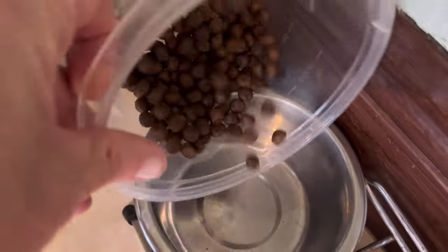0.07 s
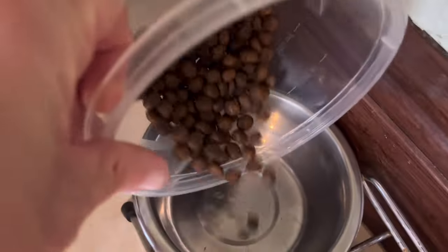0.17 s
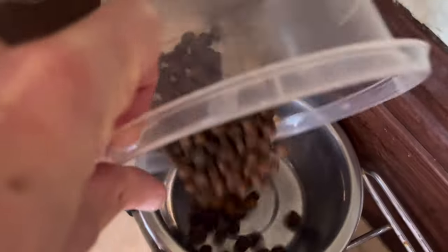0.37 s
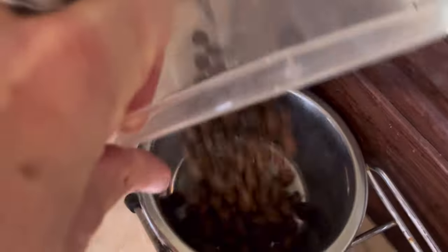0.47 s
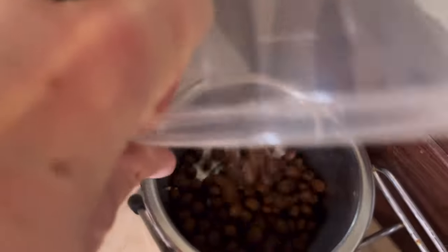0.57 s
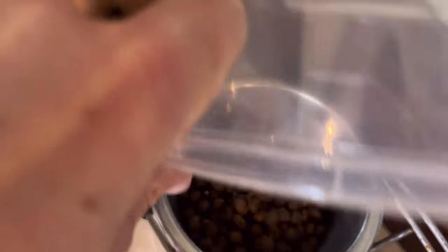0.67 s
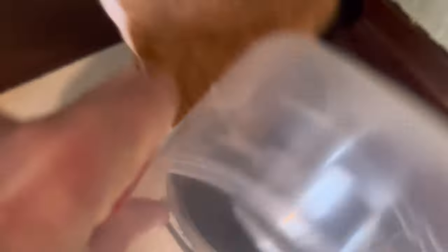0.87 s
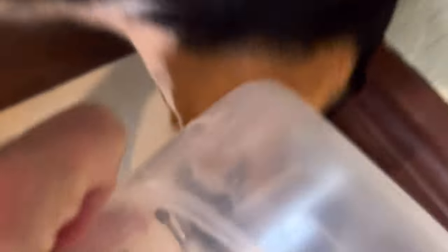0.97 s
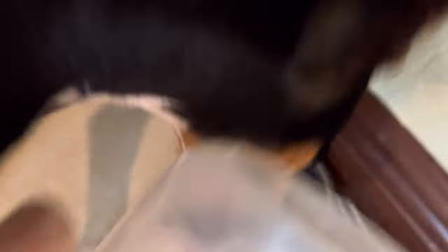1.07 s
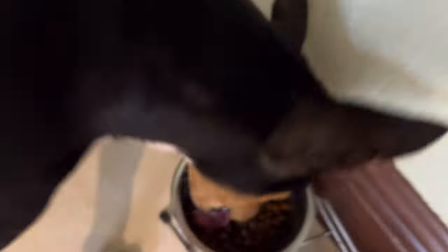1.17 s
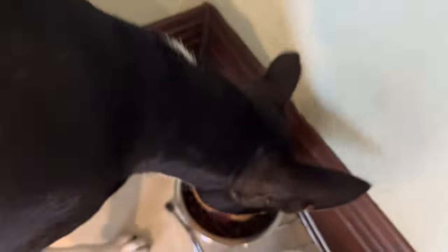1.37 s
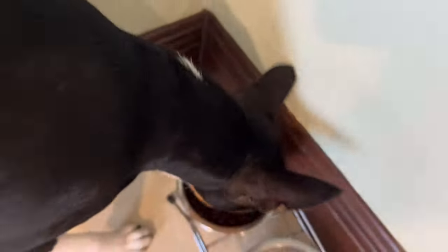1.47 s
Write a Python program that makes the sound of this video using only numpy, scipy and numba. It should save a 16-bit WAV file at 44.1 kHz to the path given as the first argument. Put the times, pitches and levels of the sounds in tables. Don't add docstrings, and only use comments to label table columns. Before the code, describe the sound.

Dry pet food pellets pour from a plastic tub into a ringing steel bowl, then settle

```python
import sys
import numpy as np
from scipy import signal
from scipy.fft import rfft, irfft
from scipy.io import wavfile
from scipy.ndimage import uniform_filter1d
from numba import njit

SR = 44100
rng = np.random.default_rng(int(sys.argv[2]) if len(sys.argv) > 2 else 0)


def wav_out(sig):
    wavfile.write(sys.argv[1], SR, np.round(np.clip(np.atleast_2d(sig).T, -1, 1) * 32767).astype(np.int16))


def level_to_linear(level):
    exponent = np.asarray(level, float) / 20
    return 10 ** exponent


N = 66150
T = np.arange(N) / SR

# pitch in Hz, level in dB per Hz.
ROOM_TONE = [(15, -54), (25, -26), (118, -12), (264, -17.5), (344, -22), (588, -26.5), (691, -22.5),
             (4870, -39.5), (15000, -52)]
# pitch in Hz, level in dB, width of its wavering in Hz.
HUM = [(60, -52, 18), (120.1, -55.5, 12)]
# time in seconds, gain in dB.
ROOM_GAIN = [(0, 9), (.25, 9.5), (.33, -12), (.72, -10), (.85, 13.5), (1.5, 4.5)]

# time in seconds, level in dB.
SLIDE_LEVEL = [(0, -31), (.03, -38), (.06, -38), (.12, -30), (.2, -32), (.25, -27), (.29, -40.5)]
# pitch in Hz, level in dB per Hz.
SLIDE_TONE = [(120, -55), (200, -10), (880, 3), (1490, -6), (2020, -2.5), (6420, -15.5), (7970, -20.5),
              (11400, -17.5), (15000, -45)]
# start in seconds, peak in dB, pitch in Hz.
TUB_KNOCKS = [(.003, -19, 2100), (.016, -15, 650), (.030, -28, 1860), (.037, -30, 3220), (.067, -24, 3260),
              (.093, -20, 2530), (.107, -22.5, 910), (.1155, -20, 1150), (.127, -18.5, 2130),
              (.1365, -14, 784), (.160, -27, 1920), (.167, -19.5, 1940), (.194, -14.5, 2120),
              (.2005, -17.5, 2110), (.2232, -13, 2900), (.250, -18.5, 1970), (.262, -25, 2370)]
# start in seconds, peak in dB, pitch in Hz.
EXTRA_KNOCK = (.2445, -6, 2520)
# pitch in Hz, level in dB.
TUB_BODY = [(650, -7.5), (950, -3.5), (2050, 1), (2850, -1.5), (3300, -6.5), (4400, -5.5), (5400, -15),
            (6700, -33)]

# time in seconds, level in dB.
POUR_LEVEL = [
    (.27, -24.5),
    (.33, -19.5),
    (.45, -15.5),
    (.62, -20.5),
    (.685, -28),
    (.72, -38.5),
    (.76, -44.5),
    (.8, -57),
]
# pitch in Hz, level in dB per Hz.
POUR_TONE = [(180, -70), (300, -60), (704, 4), (2180, -7.5), (2660, -2), (5840, -1), (8520, -2),
             (12800, -10.5), (15100, -39)]
# time in seconds, level in dB.
BARE_SHARE = [(.28, -8.5), (.45, -13.5), (.6, -7.5), (.75, -4)]
# time in seconds, level in dB.
COVERED_SHARE = [(.28, -2.5), (.4, -5), (.55, 1.5), (.7, 1)]
# time in seconds, decay in dB per second.
PILE_DAMPING = [(.28, 15), (.38, 35), (.485, 101), (.53, 438), (.75, 900)]
# start in seconds, peak in dB, pitch the struck spot favours in Hz.
STRIKES = [(0.2807, -7, 1700), (0.2832, -10.5, 667), (0.298, -13.5, 4500), (0.3306, -5, 667),
           (0.3457, -11.5, 4700), (0.354, -12.5, 2830), (.370, -18, 1730), (0.399, -11.5, 1860),
           (0.406, -5, 2950), (0.417, -15.5, 4800), (0.425, -13, 1722), (0.4433, -9.5, 1722),
           (.459, -19.5, 1710), (0.4747, -9.5, 1700), (0.508, -10.5, 5200), (0.5836, -13, 670),
           (.621, -8.5, 2340)]
EMPTY_HZ = [667, 941, 1722, 2888, 2966, 3077, 4065, 4612, 4846, 5013, 5620, 5803, 5857, 7675]
# level in dB, time to fall 60 dB in seconds, left over right in dB.
EMPTY_RING = [(-4, 0.26, -6), (-4.5, 0.15, -3), (-2, 0.53, -0.5), (-7.5, 1.3, -6), (-10.5, 0.93, 11.5),
              (-2, 0.244, -6.5), (-4.5, 0.58, 16), (-8.5, .7, 15), (5, 0.32, 5), (-11.5, 1.4, 5),
              (-2.5, 1.3, 7), (-24, 0.32, 1), (-8, 1.2, 6), (-3, 0.15, 12.5)]
RIM_HZ = [1274, 2075, 2270, 2450, 4393, 5770, 6390, 6720, 7600, 9970, 11500, 11940, 12470, 13200]
# level in dB, time to fall 60 dB in seconds.
RIM_RING = [(-1.5, 0.049), (1, 0.048), (1, 0.049), (-15.5, 0.22), (3, 0.13), (2, 0.098), (3.5, 0.076),
            (-8.5, 0.057), (-5.5, 0.11), (1.5, 0.11), (-0.5, 0.085), (-21, 0.11), (-6, 0.08), (-3.5, 0.091)]
# pitch in Hz, width in Hz, depth in dB.
BOWL_GAPS = [(8550, 380, -45), (10750, 230, -45)]

# pitch in Hz, level in dB.
FULL_BODY = [(1150, 0), (1330, -1), (2080, -2), (2550, -7), (3200, -9), (4700, -15), (6300, -19)]
# time in seconds, level in dB.
WASH_LEVEL = [(.62, -36.5), (.7, -31.5), (.8, -35.5), (.9, -40), (.97, -46.5), (1.06, -62.5), (1.1, -75)]
# pitch in Hz, level in dB per Hz.
WASH_TONE = [(400, -27), (1200, 8), (1650, -0.5), (3600, -0.5), (4450, 6.5), (5500, 3.5), (6700, -2),
             (8200, -5), (15000, -29)]
# start in seconds, peak in dB, pitch in Hz.
TICKS = [(.817, -21.5, 2290), (.8215, -25, 2950), (.834, -25.5, 1140), (.867, -25, 2300),
         (.9095, -25, 2190), (.946, -22, 2280), (.973, -25, 2320), (1.0135, -27.5, 2520),
         (1.038, -32, 2470)]

# start in seconds, level in dB, first pitch in Hz, last pitch in Hz,
# length in seconds.
BUMPS = [
    (0.843, -25.5, 100.7, 80.4, 0.075),
    (0.868, -21.5, 96, 73, 0.022),
    (.914, -15, 294, 68.4, 0.02),
    (0.976, -31.5, 89, 60, 0.052),
    (1.122, -28.5, 794, 590, 0.0036),
    (0.821, -35.5, 610, 550, 0.015),
]

# time in seconds, level in dB.
MUZZLE_LEVEL = [(1.22, -73), (1.27, -44.5), (1.32, -46), (1.4, -54), (1.44, -47.5), (1.5, -35)]
# pitch in Hz, level in dB per Hz.
MUZZLE_TONE = [(400, -50), (850, -14), (1200, 0), (1600, -7), (2100, -3), (3500, -15), (7000, -24),
               (15000, -42)]
# start in seconds, peak in dB, pitch in Hz.
NUDGES = [(1.2825, -23, 2070), (1.288, -25.5, 1240), (1.292, -29, 1306), (1.2945, -30, 2010),
          (1.304, -38, 1940), (1.327, -25, 1240), (1.333, -25, 1240), (1.341, -39, 1380),
          (1.345, -45, 1900), (1.369, -46, 2180), (1.372, -36, 1230), (1.396, -27.5, 1350),
          (1.4205, -29, 2030), (1.429, -30, 1180), (1.4355, -31.5, 2310), (1.441, -24, 1190),
          (1.4685, -35, 1170), (1.481, -39, 1870), (1.495, -15.5, 1960), (1.498, -27, 1240)]
# start in seconds, peak in dB, pitch in Hz.
EXTRA_NUDGE = (1.331, -29, 3200)
# start in seconds, peak in dB, pitch in Hz.
SNAP = (1.3573, -15.5, 1250)
# pitch in Hz, level in dB.
SNAP_BODY = [(2100, 2.5), (2700, -9), (4800, -4), (5900, -13), (7000, -22), (9800, -19)]

# pitch in Hz, width in Hz, depth in dB.
TREBLE_DIP = (8250, 300, -10)


def evened(x):
    return x / np.sqrt(np.mean(x ** 2) + 1e-20)


def curve(points, off=None):
    s, value = np.transpose(points)
    return np.interp(T, s, value, off, off)


def colour(x, tone):
    f, db = np.transpose(tone)
    hz = np.fft.rfftfreq(N, 1 / SR)
    gain_db = np.interp(np.log(hz + 1), np.log(f + 1), db)
    return irfft(rfft(x) * level_to_linear(gain_db), N)


def dipped(x, dips):
    hz = np.fft.rfftfreq(N, 1 / SR)
    gain_db = sum(db * np.exp(-((hz - f) / width) ** 4) for f, width, db in dips)
    return irfft(rfft(x) * level_to_linear(gain_db), N)


def add(mix, s, sound):
    part = mix[:, round(s * SR):][:, :sound.shape[1]]
    part += sound[:, :part.shape[1]]


def air():
    left, other = rng.standard_normal((2, N))
    same = 0.85
    right = same * left + np.sqrt(1 - same ** 2) * other
    out = level_to_linear(-55) * evened(colour(np.array([left, right]), ROOM_TONE))
    for hz, db, width in HUM:
        noise = rng.standard_normal(N) + 1j * rng.standard_normal(N)
        slow = signal.lfilter([1], [1, -np.exp(-np.pi * width / SR)], noise)
        waver = slow / abs(slow).mean() + 1.43
        out += level_to_linear(db) * evened((np.exp(2j * np.pi * hz * T) * waver).real)
    return out * level_to_linear(curve(ROOM_GAIN))


def grains(level_db, tone, per_s, spread_db, cycles, wide_db, count=28):
    size = level_to_linear(spread_db * np.minimum(rng.exponential(1, N), 4))
    size = size * (rng.random(N) < per_s / SR) * rng.choice([-1., 1.], N)
    kind = rng.integers(0, count, N)
    t = np.arange(1024) / SR
    out = np.zeros((2, N))
    for k, hz in enumerate(np.geomspace(300, 14500, count)):
        clack = np.sin(2 * np.pi * hz * t) * np.exp(-t * hz / cycles)
        clack[:2] += [.5, -.5]
        clack = clack * np.sqrt(hz) / np.linalg.norm(clack)
        line = signal.oaconvolve(size * (kind == k), clack)[:N]
        side, lag = rng.uniform(-1, 1, 2)
        left = line * level_to_linear(wide_db * side)
        right = np.roll(line, int(6 * lag)) * level_to_linear(-wide_db * side)
        out += [left, right]
    clumps = uniform_filter1d(rng.standard_normal(N), size=500)
    clumps = evened(uniform_filter1d(clumps, size=500))
    return evened(colour(out, tone)) * level_to_linear(level_db + 2 * clumps)


def taps(events, body, own_db, t60, pan_db, burst_s, low_hz, rise_s):
    out = np.zeros((2, N))
    t = np.arange(2048) / SR
    high_pass = signal.butter(2, low_hz, "high", fs=SR, output="sos")
    luck = rng.standard_normal((len(events), len(body) + 512))
    for (s, db, hz), chance in zip(events, luck):
        x = level_to_linear(own_db) * np.sin(2 * np.pi * hz * t)
        for (f, level), q in zip(body, chance):
            x = x + level_to_linear(level + 2 * q) * np.sin(2 * np.pi * f * (1 + q / 50) * t)
        scrape = uniform_filter1d(np.resize(chance, 2048), size=9) * np.exp(-t / burst_s)
        x = x * level_to_linear(-60 * t / t60) + 1.5 * scrape
        x = signal.sosfilt(high_pass, x * np.minimum(t / rise_s, 1))
        add(out, s, level_to_linear(db) / abs(x).max() * x * level_to_linear([[pan_db / 2], [-pan_db / 2]]))
    return out


def tub():
    slide = grains(curve(SLIDE_LEVEL, -200), SLIDE_TONE, 6000, 1.2, 3.1, 8.9)
    return slide + taps([*TUB_KNOCKS, EXTRA_KNOCK], TUB_BODY, 6, 0.018, -5.5, 0.0066, 260, 0.00028)


@njit
def ring(drive, kick, pole, keep):
    out, z = np.zeros(len(drive), np.complex128), 1e-9 + 0j
    for i in range(len(drive)):
        z = z * pole * keep[i] + drive[i]
        if kick[i] > 0:
            z *= np.sqrt(1 + (kick[i] / (abs(z) + 1e-30)) ** 2)
        out[i] = z
    return out


def steel(modes, level_db, share_db, pile_share, per_s, spread_db):
    hit_db = spread_db * np.minimum(rng.exponential(1, N), 3) + curve(POUR_LEVEL, -200) + share_db - 11
    hits = level_to_linear(hit_db) * (rng.random(N) < per_s / SR)
    hard = np.zeros(N)
    favoured_hz = np.ones(N)
    for s, db, hz in STRIKES:
        i = round(s * SR)
        favoured_hz[i] = hz
        hard[i] = level_to_linear(db + np.interp(s, T, share_db))
    out = np.zeros((2, N))
    for hz, db, t60, pan_db in modes:
        pile_decay = pile_share * curve(PILE_DAMPING) * (0.59 + hz / 4000 + (700 / hz) ** 2)
        keep = level_to_linear(-(60 / t60 + pile_decay) / SR)
        favour = 0.7 + 1.35 * np.exp(-(8 * np.log(hz / favoured_hz)) ** 2)
        kick = hard * rng.uniform(0.35, 1, N) * favour
        z = ring(hits * rng.standard_normal(N), kick, np.exp(2j * np.pi * hz / SR), keep)
        blur_hz = 0.0022 * hz
        z = z * np.exp(1j * np.cumsum(rng.standard_normal(N)) * np.sqrt(2 * np.pi * blur_hz / SR))
        lead = np.exp(1j * rng.standard_normal() / 5)
        left = (z * lead).imag * level_to_linear(pan_db / 2)
        right = (z / lead).imag / level_to_linear(pan_db / 2)
        out += level_to_linear(db + level_db) * np.array([left, right])
    return out


def bowl():
    empty = [(hz, *row) for hz, row in zip(EMPTY_HZ, EMPTY_RING)]
    rim = []
    for hz, (db, t60) in zip(RIM_HZ, RIM_RING):
        rim += [(hz, db, t60, 3), (hz * 1.019, db, t60, -3)]
    bare, covered = curve(BARE_SHARE), curve(COVERED_SHARE)
    ringing = steel(empty, -1, bare, 1.0, per_s=420, spread_db=3.0)
    ringing += steel(rim, -11, covered, 0.51, per_s=790, spread_db=3.5)
    hard_hits = [(s, db - 10, 2300) for s, db, _ in STRIKES]
    cracks = taps(hard_hits, FULL_BODY, 0, 0.01, 0, 0.0033, 950, 0.00032)
    clatter = grains(curve(POUR_LEVEL, -200) + covered - 2.5, POUR_TONE, 14000, 1.5, 16, 3)
    return dipped(ringing + cracks + clatter, BOWL_GAPS)


def wash_and_ticks():
    wash = grains(curve(WASH_LEVEL, -200), WASH_TONE, 30000, .8, 14, 2)
    return wash + taps(TICKS, FULL_BODY, 6.9, .016, -2, 0.0074, 760, 0.00025)


def hand():
    out = np.zeros((2, N))
    for s, db, start_hz, end_hz, length in BUMPS:
        u = np.arange(0, 2 * length, 1 / SR) / length
        hz = end_hz + (start_hz - end_hz) * np.exp(-3.2 * u)
        swell = 7.4 * u ** 1.1 * np.exp(-3.1 * u)
        bump = level_to_linear(db) * swell * -np.sin(2 * np.pi * np.cumsum(hz) / SR)
        add(out, s, bump * level_to_linear([[1.6], [-1.6]]))
    scuff_s, scuff_length_s, scuff_db = .816, .03, -46
    u = np.arange(0, 1, 1 / SR / scuff_length_s)
    hiss = np.diff(rng.standard_normal((2, len(u) + 1)))
    add(out, scuff_s, level_to_linear(scuff_db) * np.sin(np.pi * u ** 1.5) * hiss)
    return out


def muzzle():
    stir = grains(curve(MUZZLE_LEVEL, -200), MUZZLE_TONE, 9000, 1.5, 6, 2)
    nudges = taps([*NUDGES, EXTRA_NUDGE], FULL_BODY, 4, 0.031, -3, 0.0098, 980, 0.0015)
    return stir + nudges + taps([SNAP], SNAP_BODY, 2.3, 0.02, -1, 0.0025, 1170, .0001)


def room(x):
    level_db, t60_s = -10.5, 0.37
    t = np.arange(SR // 2) / SR
    tail = signal.lfilter([1], [1, -.5], rng.standard_normal((2, len(t))))
    tail = tail * level_to_linear(-60 * t / t60_s) * (t > .003)
    return level_to_linear(level_db) * signal.fftconvolve(x, tail / np.linalg.norm(tail[0]), axes=1)[:, :N]


def scene():
    near = tub() + bowl() + wash_and_ticks() + muzzle()
    return near + room(near) + hand() + air()


def low_pass(x):
    return signal.sosfilt(signal.butter(12, 15280, fs=SR, output="sos"), x)


def record(dry):
    hz = np.fft.rfftfreq(N, 1 / SR)
    treble_cut = 1 / (1 + (hz / 13900) ** 110)
    bass_cut = 1 / (1 + (42 / (hz + 1)) ** 4)
    turn = np.exp(.5j * 1.3 * np.array([[1], [-1]]))
    x = irfft(rfft(dipped(dry, [TREBLE_DIP])) * treble_cut * bass_cut * turn, N)
    mix = np.tanh(x / 2) * 2
    return low_pass(mix)


dry = scene()
out = record(dry)
wav_out(out)
```